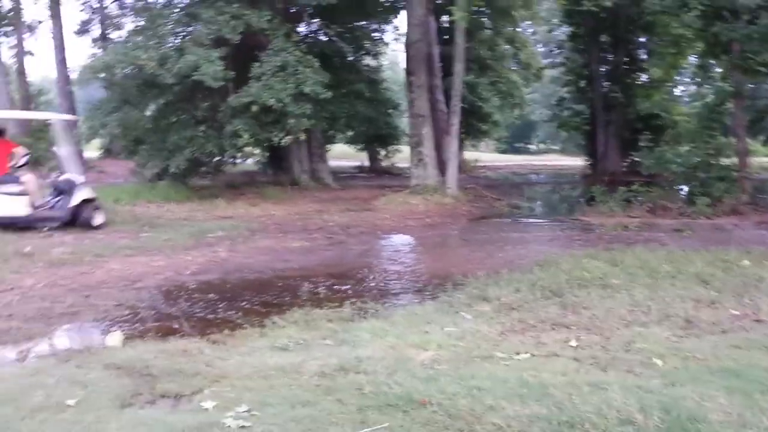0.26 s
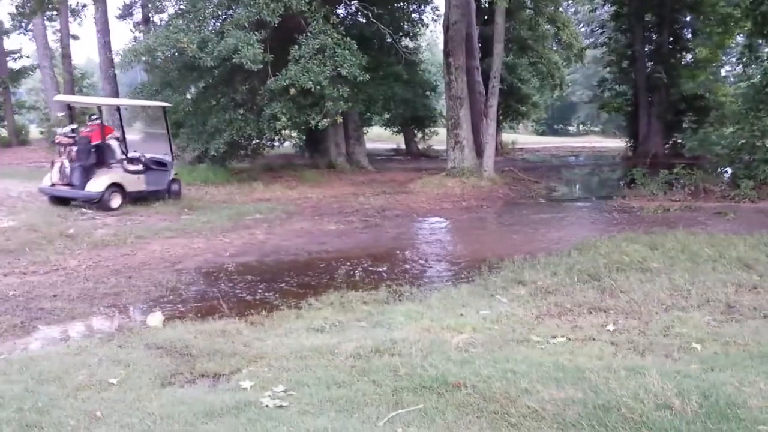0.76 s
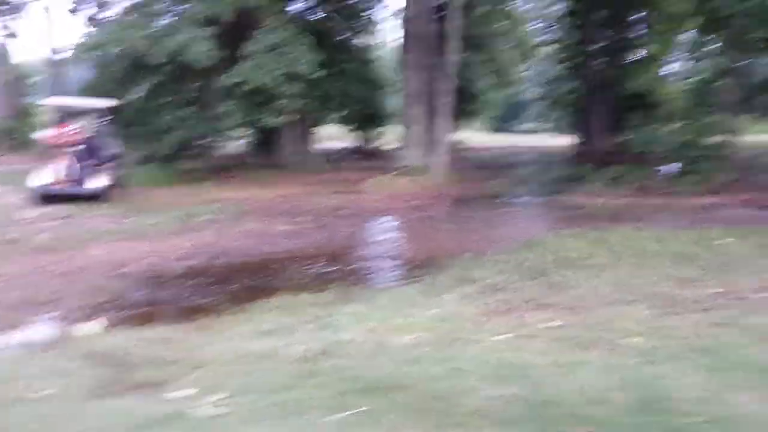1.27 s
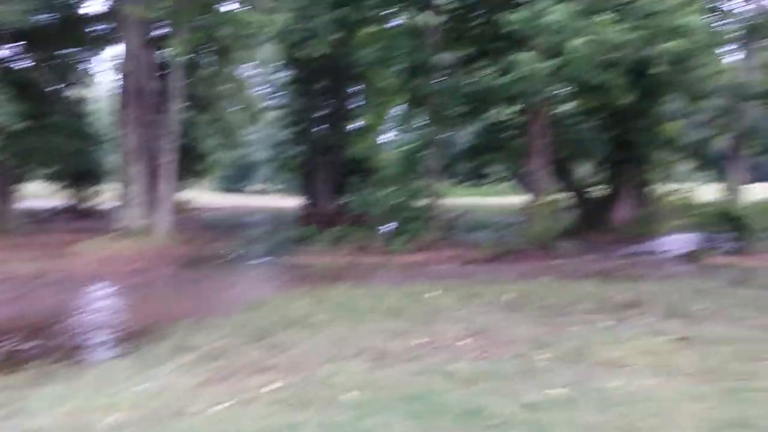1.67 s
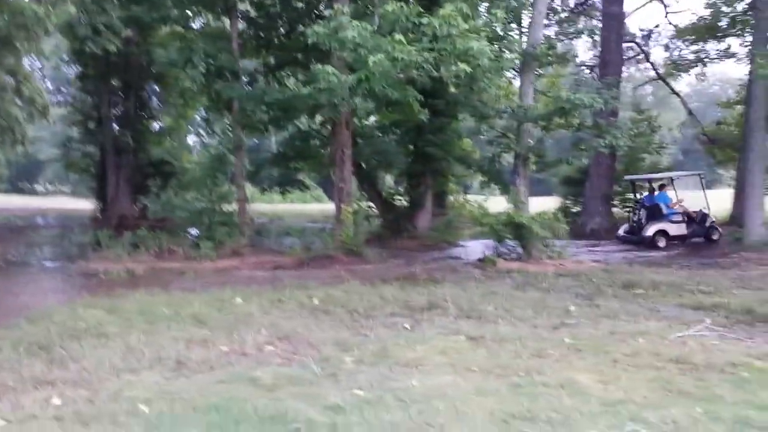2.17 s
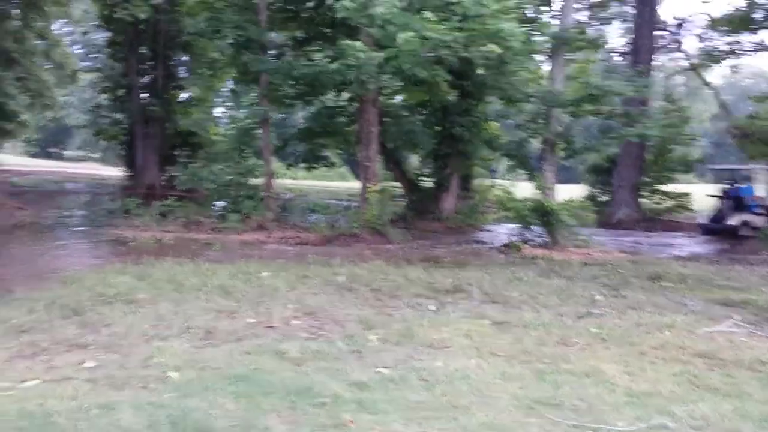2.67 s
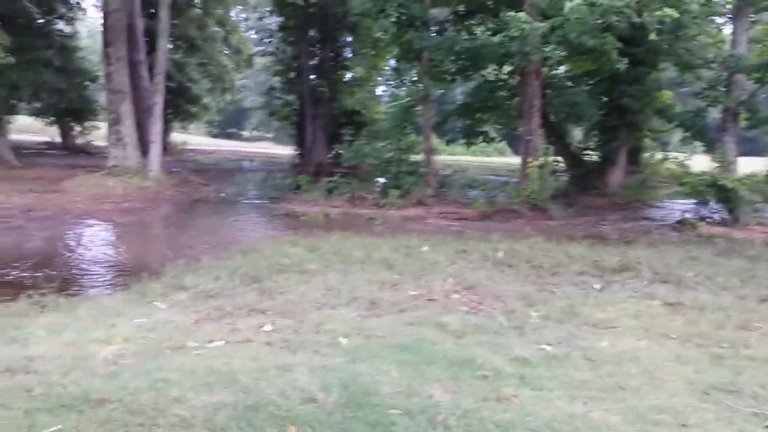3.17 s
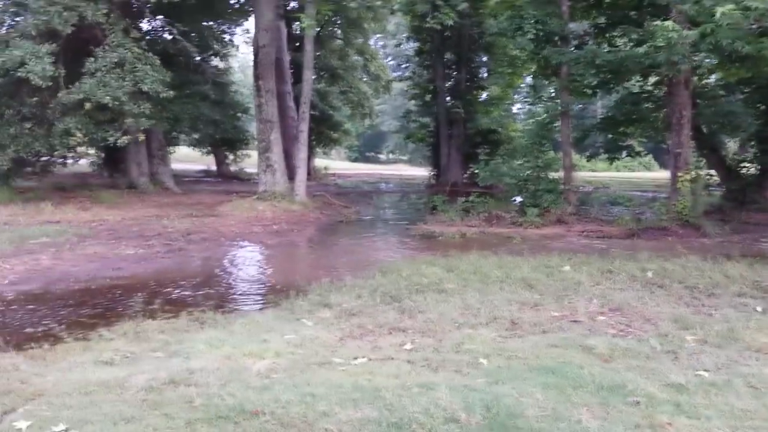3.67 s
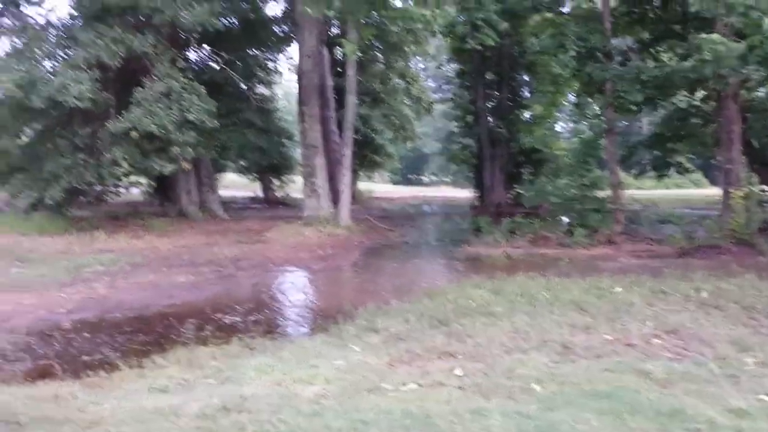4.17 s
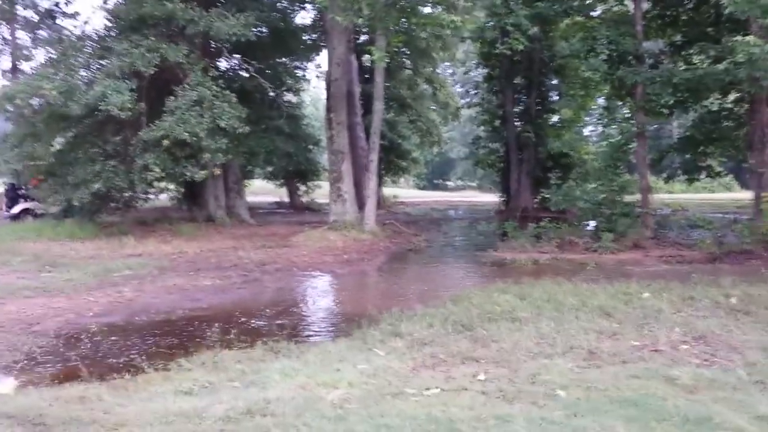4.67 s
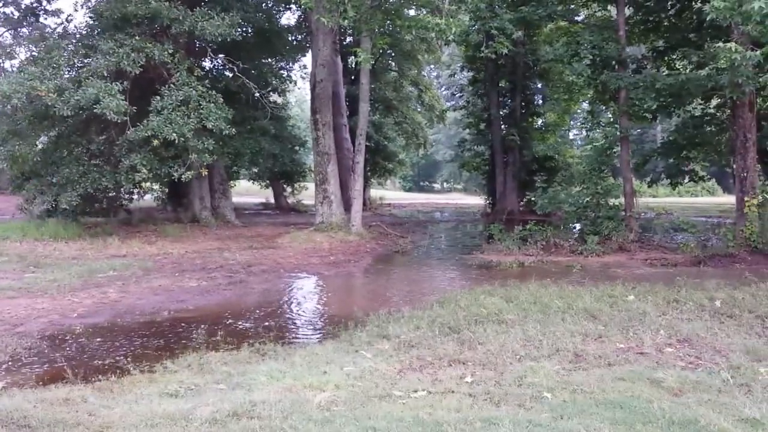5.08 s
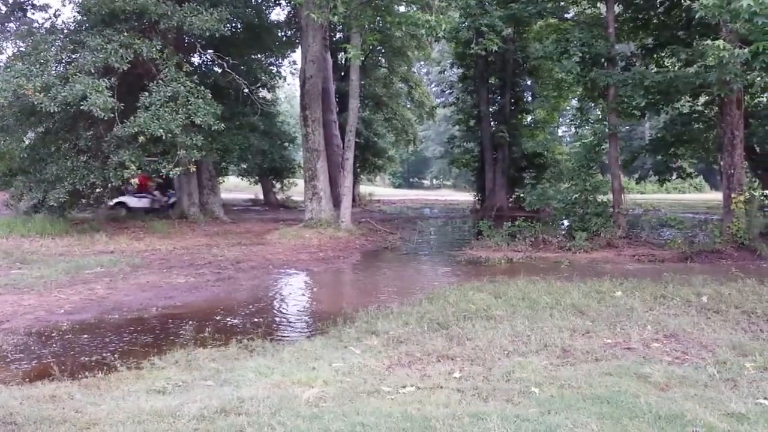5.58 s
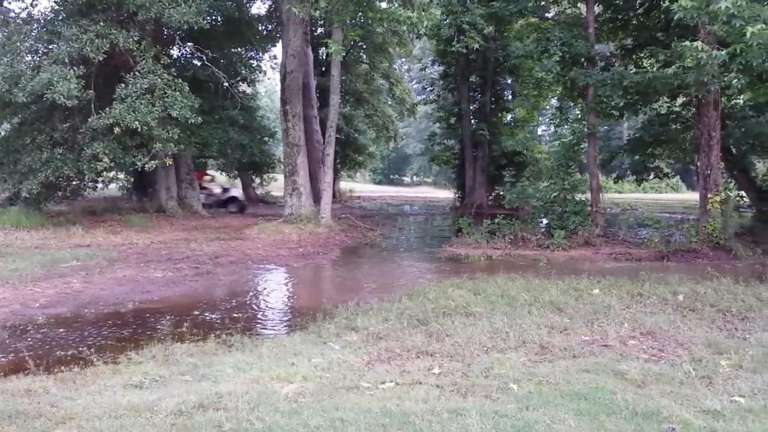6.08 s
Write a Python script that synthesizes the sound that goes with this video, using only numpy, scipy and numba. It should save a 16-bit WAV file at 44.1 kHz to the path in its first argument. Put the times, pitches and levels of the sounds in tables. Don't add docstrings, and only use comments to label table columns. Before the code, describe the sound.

Outdoors among trees, two small single-cylinder carts drive over wet ground some way off. Low puttering firings overlap, with gear and pulley whine. Slaps come first, then a rapid train of belt chirps as one pulls hard. It fades and slows in the middle, then pulls away again more gently. Watery tyre hiss, splashes and rattles continue throughout. Handheld stereo phone, bright and slightly uneven left to right.

```python
import sys
import numpy as np
from scipy import signal
from scipy.fft import rfft, irfft, next_fast_len
from scipy.io import wavfile
from scipy.ndimage import uniform_filter1d, map_coordinates
from numba import njit

SR = 44100
rng = np.random.default_rng(int(sys.argv[2]) if len(sys.argv) > 2 else 0)


def gain_from_decibels(decibels):
    exponent = np.asarray(decibels, float) / 20
    return 10 ** exponent


def dump_mix(stems):
    frames = np.atleast_2d(stems).T
    limited = np.clip(frames, -1, 1)
    pcm = np.round(limited * 32767).astype(np.int16)
    wavfile.write(sys.argv[1], SR, pcm)


N = 279153
TIME = np.arange(N) / SR

# (time [s], rate [Hz])
STEADY_RATE = [(0, 21.3), (.4, 20.7), (1.2, 22.1), (2, 22), (2.4, 22.8), (2.8, 24.1), (3.35, 24.6),
               (3.8, 24.2), (4.3, 21.8), (5, 20), (5.4, 21), (5.8, 20.5), (6.1, 21.8), (6.33, 22)]
PULLING_RATE = [(0, 14.5), (.5, 15.5), (1, 20), (1.25, 20.9), (1.4, 22), (1.6, 22.4), (1.9, 23.6),
                (2.1, 22), (2.7, 16), (3.5, 16.6), (3.8, 18.2), (4.55, 21.1), (4.9, 22), (5.3, 24.3),
                (5.6, 25.2), (5.9, 24), (6.33, 24)]
# (time [s], level [dB], upper resonances [dB])
STEADY_LEVEL = [(0, -24, 0), (.15, -33.5, 7), (.33, -29.5, 1), (.45, -35.5, 13.5), (.81, -26.5, -2),
                (1.04, -38, 16), (1.29, -35, 2), (1.85, -33, -12), (2.1, -33, 10.5), (2.5, -41.5, 13),
                (2.7, -32, 6.5), (3.24, -31, 2.5), (3.6, -30, -5), (4.15, -32.5, -8), (4.93, -32, -6),
                (5.2, -30, 6), (5.75, -37.5, -9), (6.33, -33.5, 2)]
# (time [s], level [dB])
PULLING_LEVEL = [(0, -31), (.4, -42), (.5, -31), (1.34, -23), (1.73, -23.5), (1.8, -27.5), (2.31, -50),
                 (3.2, -36.5), (4.16, -33), (4.27, -36.5), (4.58, -33), (4.99, -28.5), (5.25, -28.5),
                 (5.33, -31), (5.54, -28.5), (5.6, -35), (6.33, -34)]
PULLING_UPPER_DB = -8
# (frequency [Hz], width [Hz], level [dB])
STEADY_PIPE = [(48.7, 65, -9), (90.4, 47, 5), (146, 55, 5), (208, 117, 0), (327.5, 34.5, 3.5),
               (590, 106, -19), (848, 53, -47)]
PULLING_PIPE = [(43, 16, -5), (99, 19, 0.5), (191, 50, 2.5), (262.4, 66, 5.5), (398, 30, -21),
                (555, 320, -12.5), (880, 50, -55)]
BAFFLES_S = [.0031, .0057, .0093, .0149]
# (time [s], pitch factor [1])
BOOM_PITCH = [(0, 1.28), (.95, 1.08), (1.15, 0.89), (1.8, 1.025), (4.3, 1.1), (4.7, 1.145), (5.02, 1.12),
              (5.12, 1.1), (5.33, 0.99), (5.42, 0.93), (5.5, 1.16), (5.6, 1.05), (6.33, 1.05)]
BOOM_SPAN_HZ = 150, 300
KNOCK_LEAD_S = 0.009

# (middle [s], peak [dB], length [s])
TAPPET = [
    (6.04, -39, 0.35),
    (1.25, -38, 0.23),
    (3.84, -43, 0.33),
]
TAPPET_AT_S = 6.02

# (time [s], frequency [Hz], peak [dB], length [s])
GEARS = [(0.358, 1430, -33, 0.37), (0.63, 1396, -25, 0.034), (0.949, 1457, -21.5, 0.054),
         (1.169, 1390, -18.5, 0.024), (1.262, 1407, -26, 0.013), (1.452, 1420, -24.5, .015),
         (1.585, 1401, -22.5, 0.016), (1.661, 1370, -30, .06), (2.121, 1450, -27, 0.085),
         (2.358, 1387, -30.5, 0.1), (4.035, 1448, -37.5, 0.31), (4.454, 1425, -35.5, 0.16),
         (4.701, 1394, -41, 0.15), (4.952, 1390, -35, 0.093), (5.202, 1382, -33.5, 0.17),
         (5.47, 1359, -38.5, 0.2)]
# (time [s], frequency [Hz])
PULLEY_PITCH = [(0, 863), (.5, 870), (.95, 850), (1.3, 853), (2, 900), (2.2, 880), (2.55, 904), (2.66, 920),
                (2.75, 990), (2.88, 922), (3.12, 1000), (3.3, 905), (4, 823), (4.45, 898), (4.8, 880),
                (5.2, 837), (6.33, 792)]
PULLEY_DB, PULLEY_PER_NEAR, PULLEY_PER_LOAD = -30, 1, 0.18
NEAR_DB, LOAD_DB = -31, -33
CASING_HZ, CASING_DB = 597, -44.5

# (time [s], peak [dB], frequency [Hz])
SQUEAKS = [(0.5676, -29, 2150), (0.63, -27, 2180), (0.941, -32, 2160), (1.0585, -35, 2220),
           (1.1089, -30, 2140), (1.1583, -23.5, 2134), (1.2062, -26, 2100), (1.254, -21, 2100),
           (1.2674, -26, 2060), (1.301, -20, 2160), (1.3483, -19, 2190), (1.3942, -22, 2170),
           (1.4391, -19.5, 2180), (1.484, -22, 2230), (1.5294, -21, 2210), (1.5743, -26, 2170),
           (1.617, -29, 2290), (1.6626, -26.5, 2170), (1.707, -23, 2260), (1.7505, -24, 2270),
           (1.7993, -26, 2220), (1.8367, -22, 2260), (1.879, -23, 2260), (1.93, -32, 2330)]
# (time [s], peak [dB], frequency [Hz])
FAR_SQUEAKS = [(3.0624, -33, 2740), (3.1435, -31, 2540), (3.2111, -35, 2770), (3.3423, -33, 2720),
               (3.4032, -32, 2600), (3.4426, -33, 2630), (3.4825, -35, 2820), (3.5219, -33, 2810),
               (3.6092, -32, 2810)]
SQUEAK_RISE_S, SQUEAK_FALL_S, SQUEAK_BEND_PER_S, SQUEAK_DB = 0.00095, 0.0032, 0.65, 10.5
# (middle [s], peak [dB], length [s])
BELT_RUB = [
    (.62, -51, .15),
    (1.0, -46, .1),
    (1.25, -41, .2),
    (1.7, -51, 0.15),
]
RUB_HZ = 2170

# (time [s], hiss [dB], roll [dB])
TYRES = [(0.0, -28, -32), (0.09, -27.5, -31.5), (0.3, -28, -34.5), (1.5, -25, -31.5), (1.97, -27.5, -33),
         (2.26, -33, -33), (3.01, -32.5, -33.5), (3.26, -33.5, -38), (3.45, -35.5, -38), (4.21, -32, -36.5),
         (4.28, -33, -41.5), (4.44, -34, -38), (4.7, -32.5, -40), (4.94, -36, -42.5), (5.05, -34, -44),
         (5.38, -31.5, -42.5), (5.82, -37.5, -47.5), (6.33, -30, -39.5)]
# (time [s], level [dB], length [s])
PUDDLES = [(0, -14, 0.026), (0.538, 1, 0.19), (0.885, -3, 0.25), (1.51, -4, 0.049), (1.82, 6.5, 0.058),
           (2.07, -4, 0.11), (1.916, 6, 0.026), (2.198, 6.5, 0.15), (2.747, 0, .15), (2.567, -7, 0.034),
           (3.183, 7, 0.047), (3.404, -11, 0.019), (3.707, 10.5, 0.043), (3.846, 6.5, 0.086),
           (4.063, 8, 0.02), (4.323, 17.5, 0.029), (4.659, 5, 0.12), (4.996, 21, 0.017), (5.034, 15, 0.037),
           (5.515, 14, 0.024), (5.873, -1, 0.086)]
# (frequency [Hz], level [dB])
ROLL = [(60, -9.5), (250, 5.5), (450, -2.5), (900, -5), (1200, -10.5), (1500, -10.5), (1900, -12.5),
        (3000, -18), (4000, -36)]
# (frequency [Hz], side minus mid [dB])
ROLL_SIDE = [(60, -22), (250, -9.5), (600, -8), (1200, 1.5), (4000, 1)]
# (time [s], lag [samples])
PORT_LAG = [(0, 8), (.6, 5.6), (1.2, 5.9), (1.55, 8.4), (1.72, 10.1), (1.9, 11.7), (2.5, 10.4), (3.2, 14.7),
            (3.7, 8.7), (4.3, 8.7), (5.2, 7.1), (6.33, 4.5)]
SPRAY_DB, SPRAY_PER_NEAR, ROLL_DB, HISS_DB = -13, 0.92, 5, 4.5
HISS_SHARED = 0.78

# (time [s], peak [dB], frequency [Hz])
SLAPS = [(0.106, -12, 5200), (.1735, -20, 5490), (0.2256, -5.5, 5730), (.2365, -5, 5700),
         (0.3017, -10, 5300), (.325, -0.5, 5900), (0.455, -9, 6770), (.9782, -17, 5960),
         (1.3668, -26, 5350), (1.4545, -14, 6070), (1.5533, -11, 6100), (1.592, -7, 6430),
         (1.787, -8, 5440), (2.159, -11.5, 6000), (2.734, -15.5, 6640), (2.778, -17, 6040),
         (2.845, -8.5, 5250), (3.1592, -18, 5970), (3.21, -22, 6500), (3.23, -19, 5600), (3.345, -20, 5800),
         (3.412, -19, 5200), (3.276, -19, 5550), (3.301, -21, 5600), (3.4326, -13.5, 5900),
         (3.4436, -11.5, 4650), (3.482, -14, 6100), (4.537, -17, 5270), (4.546, -16, 6460),
         (4.6137, -13, 6440), (4.658, -14.5, 5580), (5.3148, -21, 6100), (6.02, -16, 5970),
         (6.1562, -18, 6330)]
# (time [s], peak [dB], frequency [Hz], treble [dB])
SPLASHES = [(.0647, -9, 6070, -17), (.19, -18, 5950, -11), (1.0355, -20, 6400, -23),
            (1.261, -28, 6050, -12), (1.7705, -20, 6050, -12), (2.0495, -23, 6420, -1),
            (2.0824, -15, 4460, -18), (2.686, -23, 6500, -12), (2.548, -15, 5550, -19),
            (2.591, -17, 7400, -12), (2.9803, -13.5, 5960, -19), (3.063, -18, 6200, -12),
            (3.1114, -7, 6630, -29), (3.168, -9, 7200, -21), (3.182, -11, 5600, -17),
            (3.2968, -6, 5460, -24), (3.384, -17, 6000, -22), (3.697, -11.5, 5400, -25),
            (3.851, -15.5, 5860, -20), (4.2737, -26, 6150, -10), (3.404, -21, 5870, -16),
            (3.836, -19, 6800, -16), (4.037, -15, 6950, -22), (4.509, -21, 6385, -10),
            (4.9687, -22.5, 6870, 0), (4.984, -22, 6800, -17), (4.9002, -34, 6540, -8),
            (5.224, -28, 6500, -10), (5.5113, -15.5, 7130, -23), (5.4914, -28, 6300, -18),
            (5.88, -14, 6490, -22), (6.192, -21, 6300, -15), (6.2492, -25, 6300, -15)]
SLAP_TOP_DB, SLAP_TAIL_S = -33, 0.039

# (time [s], peak [dB], frequency [Hz], t60 [s], rise [s])
RINGS = [(0.326, -21.5, 4700, 0.07, 0.0018), (0.453, -28, 6800, .12, .002),
         (2.079, -14.5, 4425, 0.09, 0.003), (3.3, -24, 4650, 0.1, 0.003), (3.298, -26, 5100, 0.05, 0.0014),
         (3.73, -31, 4400, 0.065, .004), (3.959, -32, 6300, 0.097, .004), (2.911, -35, 2400, 0.1, 0.009),
         (4.815, -33, 3330, 0.067, .005), (4.987, -34, 2650, .08, .005), (5.025, -35, 2850, .08, .005),
         (4.51, -33, 6390, 0.27, 0.0039), (4.97, -35, 6750, 0.3, 0.0034), (6.17, -45, 4650, .4, .004)]
# (time [s], peak [dB], frequency [Hz], t60 [s], rise [s])
WHISTLE = [
    (3.975, -32, 2810, .8, .015),
    (4.02, -36, 2810, .6, .02),
    (4.06, -33, 2810, .3, .015),
]

# (frequency [Hz], level [dB])
GROUND = [(700, -0.5), (960, -3.5), (1060, -5.5), (1250, -3), (1450, -2.5), (1850, -5), (2200, -0.5)]
# (frequency [Hz], level [dB])
LEFT_PORT = [(30, -4), (100, 0), (2900, -1), (4000, 2.5), (5200, 10.5), (6250, 13.5), (7100, 6.5),
             (8200, 0), (10000, -10), (11300, -10.5), (12500, -46), (13500, -64), (15000, -28)]
RIGHT_PORT = [(30, -0.5), (100, -0.5), (2000, -2), (4000, -1.5), (5000, -0.5), (6000, -9), (7500, -4.5),
              (9000, -3.5), (11000, -10), (12500, -10), (13500, -14.5), (15000, -36.5)]


def curves(table):
    s, *columns = np.transpose(table)
    return [np.interp(TIME, s, c) for c in columns]


def swells(s, db, length, floor_db):
    s, length = np.array(s)[:, None], np.array(length)[:, None]
    bells = gain_from_decibels(np.array(db))[:, None] * np.exp(-((TIME - s) / length) ** 2)
    return 20 * np.log10(gain_from_decibels(floor_db) + bells.sum(axis=0))


def walk(rate_hz):
    k = int(SR / rate_hz)
    held = np.repeat(rng.standard_normal(N // 200), k)[:N]
    return 1.562 * uniform_filter1d(uniform_filter1d(held, k), k)


def unit(x):
    return x / np.sqrt(np.mean(x ** 2))


def colour(x, points, size=4096):
    hz, db = np.transpose(points)
    grid_hz = np.arange(size // 2 + 1) * SR / size
    gain_db = np.interp(np.log(grid_hz + 1), np.log(hz), db)
    cepstrum = irfft(np.log(gain_from_decibels(gain_db)))
    cepstrum[1:size // 2] *= 2
    cepstrum[size // 2 + 1:] = 0
    return signal.fftconvolve(x, irfft(np.exp(rfft(cepstrum))))[:N]


@njit
def band(x, hz, width):
    y, b, low = np.empty(len(x)), 0., 0.
    for i in range(len(x)):
        g, k = np.tan(np.pi * hz[i] / SR), width / hz[i]
        v = (b + g * (x[i] - low)) / (1 + g * (g + k))
        b, low, y[i] = 2 * v - b, low + 2 * g * v, k * v
    return y


def ring(x, hz, width):
    return band(x, np.full(len(x), 1. * hz), 1. * width)


def baffles(x, stretch, echo=0.66):
    size = next_fast_len(N + SR // 2)
    hz = np.arange(size // 2 + 1) * SR / size
    delays_s = stretch * np.array(BAFFLES_S)[:, None]
    turn = np.exp(-2j * np.pi * hz * delays_s)
    chambers = np.prod((turn - echo) / (1 - echo * turn), axis=0)
    return irfft(rfft(x, size) * chambers, size)[:N]


def cart(rate, db, upper_db, pipe, fires_s, stretch, intake, scatter_db, gas_db, knock, boom):
    (hz,) = curves(rate)
    turns = np.cumsum(hz * (1 + 0.003 * walk(20))) / SR
    turns += 100 - turns[int(fires_s * SR)]
    stroke = (2 * turns).astype(int)
    size = gain_from_decibels(scatter_db * rng.standard_normal(800))[stroke]
    steps = np.diff(stroke, prepend=stroke[0])
    blows = unit(steps * size * np.where(stroke % 2, intake, 1))
    blows = blows + knock * np.roll(blows, -int(KNOCK_LEAD_S * SR))
    gas = unit((0.4 + np.exp(-(turns % 1) / 0.45)) * rng.standard_normal(N))
    drive = baffles(blows + gain_from_decibels(gas_db) * gas, stretch)
    sound = np.zeros(N)
    for k, (mode_hz, width, mode_db) in enumerate(pipe):
        moves = BOOM_SPAN_HZ[0] < mode_hz < BOOM_SPAN_HZ[1]
        centre_hz = mode_hz * (boom if moves else np.ones(N))
        mode = band(band(drive, centre_hz, 1. * width), centre_hz, 2. * width)
        sound = sound + (-1) ** k * gain_from_decibels(mode_db + (mode_hz > 300) * upper_db) * mode
    return unit(sound) * gain_from_decibels(db), turns % 1, size


def tappet(phase, size):
    since = (phase - phase[int(TAPPET_AT_S * SR)]) % 1
    rattle = size ** 3 * np.exp(-since / 0.22) * rng.standard_normal((2, N))
    level_db = swells(*np.transpose(TAPPET), floor_db=-79)
    return np.array([unit(ring(ear, 9800, 3500)) for ear in rattle]) * gain_from_decibels(level_db)


def whine(hz, db, phase, width, throb, offset_db, clean):
    rough = unit(band(band(rng.standard_normal(N), hz, width), hz, 2 * width))
    pure = np.sin(2 * np.pi * np.cumsum(hz * (1 + 0.0057 * walk(40))) / SR)
    pulse = np.exp(throb * np.cos(2 * np.pi * (phase - 0.22)))
    return unit((rough + clean * pure) * pulse) * gain_from_decibels(db + offset_db)


def axle_gears(phase):
    s, hz, db, length = np.transpose(GEARS)
    level_db = swells(s, db, length, floor_db=-72)
    return whine(np.interp(TIME, s, hz), level_db, phase, width=70.0, throb=0.45, offset_db=-9, clean=1.1)


def clutch_pulley(phase, near_db, load_db):
    level_db = PULLEY_DB + PULLEY_PER_NEAR * near_db + PULLEY_PER_LOAD * load_db
    (hz,) = curves(PULLEY_PITCH)
    return whine(hz, level_db, phase, width=160.0, throb=0.68, offset_db=-4.5, clean=0.13)


def engine_casing(phase, load_db):
    hz = CASING_HZ * (1 + 0.05 * walk(2.9))
    return whine(hz, CASING_DB + 0.28 * load_db, phase, width=118.0, throb=0.53, offset_db=-1, clean=0.17)


def belt_squeaks():
    out, t = np.zeros(N + 3000), TIME[:3000]
    fall = np.exp(-t / SQUEAK_FALL_S) + 0.041 * np.exp(-t / 0.015)
    shape = (1 - np.exp(-t / SQUEAK_RISE_S)) * fall
    for s, db, hz in [*SQUEAKS, *FAR_SQUEAKS]:
        tone = np.sin(2 * np.pi * hz * t * (1 + SQUEAK_BEND_PER_S * t))
        rough = unit(ring(rng.standard_normal(len(t)), hz, 250))
        start = int(s * SR)
        out[start:start + len(t)] += gain_from_decibels(db + SQUEAK_DB) * shape * (tone + 0.23 * rough)
    return out[:N]


def belt_rub(phase):
    level_db = swells(*np.transpose(BELT_RUB), floor_db=-75)
    return whine(np.full(N, 1. * RUB_HZ), level_db, phase, width=170.0, throb=0.6, offset_db=2.5, clean=0)


def loose_metal():
    out, t = np.zeros(N + 20000), TIME[:20000]
    for s, db, hz, t60, rise in [*RINGS, *WHISTLE]:
        chatter = 0.39 * max(hz / 5000, 1) ** 4
        rough = unit(ring(rng.standard_normal(len(t)), hz, hz / 25))
        tone = np.sin(2 * np.pi * hz * t) + chatter * rough
        shape = (1 - np.exp(-t / max(rise, 1e-4))) * np.exp(-t * np.log(1000) / t60)
        start = int(s * SR)
        out[start:start + len(t)] += gain_from_decibels(db) * shape * tone
    return out[:N]


def slaps():
    out, t = np.zeros((2, N + 8000)), TIME[:8000]
    tail = np.exp(-t * np.log(1000) / SLAP_TAIL_S)
    dull = [(*row, SLAP_TOP_DB) for row in SLAPS]
    for s, db, hz, top_db in [*dull, *SPLASHES]:
        noise = rng.standard_normal((3, len(t)))
        tick = np.sign(noise[2]) * np.exp(-t / 0.0009)
        start = int(s * SR)
        for ear in range(2):
            burst = 0.69 * tick + 0.51 * noise[ear] * tail
            body = ring(ring(ring(burst, hz, 2300), hz, 3700), hz, 3700)
            top = ring(ring(burst, 10000, 7000), 12000, 9000)
            both = body / abs(body).max() + gain_from_decibels(top_db + 26.0) * top / abs(top).max()
            out[ear, start:start + len(t)] += gain_from_decibels(db - 9.0) * both
    return out[:, :N]


def tyres():
    wet_db, near_db = curves(TYRES)
    hiss_db = wet_db + HISS_DB
    puddle_db = swells(*np.transpose(PUDDLES), floor_db=5.0)
    spray_db = SPRAY_DB + SPRAY_PER_NEAR * (near_db - NEAR_DB) + puddle_db
    sizes = gain_from_decibels(7.9 * np.minimum(rng.exponential(size=N), 3.2))
    drops = np.where(rng.random(N) < 500 / SR, sizes, 0)
    swarm = 1 + 0.054 * signal.lfilter([1], [1, -0.985], drops)
    shared, gusts, out = walk(15), walk(11.2), []
    common = unit(ring(swarm * rng.standard_normal(N), 1640, 3500))
    (lag,) = curves(PORT_LAG)
    late = map_coordinates(common, [np.arange(N) - lag], mode="mirror")
    for ear in (late, common):
        noise = swarm * rng.standard_normal(N)
        hiss = unit(ring(noise, 4020, 7900)) + HISS_SHARED * ear
        hiss = hiss * gain_from_decibels(hiss_db - 7.0 + 1.0 * shared + 0.5 * walk(30))
        spray = unit(ring(noise, 10830, 7440))
        spray = spray * gain_from_decibels(hiss_db + spray_db + 4.5 + 0.1 * shared + 0.49 * gusts)
        out.append(hiss + spray)
    mid, side = (colour(rng.standard_normal(N), ROLL) for _ in range(2))
    side = colour(side, ROLL_SIDE)
    roll_db = near_db + ROLL_DB + 1.5 + 0.52 * walk(6.9)
    return np.array(out) + unit(np.array([mid + side, mid - side])) * gain_from_decibels(roll_db)


def trees(x, lag, t60, wet_db):
    t = TIME[:16000]
    tint = [(100, -36), (400, 1.0), (1200, 2.5), (16000, -2.0)]  # (Hz, dB)
    echoes = rng.standard_normal((2, len(t))) * np.exp(-t * np.log(1000) / t60) * (t > 0.002)
    echoes = [unit(colour(e, tint)) / np.sqrt(len(t)) for e in echoes]
    direct = np.array([np.roll(x, lag), x])
    return direct + gain_from_decibels(wet_db) * np.array([signal.fftconvolve(x, e)[:N] for e in echoes])


def scene():
    steady, cycle, push = cart(
        STEADY_RATE, *curves(STEADY_LEVEL), STEADY_PIPE, fires_s=3.1, stretch=1.2, intake=0.3,
        scatter_db=1.2, gas_db=-5, knock=0, boom=np.ones(N))
    (pulling_db,), (boom,) = curves(PULLING_LEVEL), curves(BOOM_PITCH)
    pulling, phase, _ = cart(
        PULLING_RATE, pulling_db, PULLING_UPPER_DB, PULLING_PIPE, fires_s=1.39, stretch=0.5, intake=0.15,
        scatter_db=1.3, gas_db=-13, knock=0.45, boom=boom)
    near_db, load_db = curves(TYRES)[1] - NEAR_DB, pulling_db - LOAD_DB
    whines = axle_gears(phase) + clutch_pulley(phase, near_db, load_db) + engine_casing(phase, load_db)
    engines = trees(steady + pulling + whines, lag=4, t60=0.18, wet_db=-4)
    belt = trees(belt_squeaks() + belt_rub(phase), lag=7, t60=0.1, wet_db=-13)
    metal = trees(loose_metal(), lag=3, t60=0.12, wet_db=-9)
    mix = engines + tappet(cycle, push) + belt + metal + slaps() + tyres()
    return np.array([colour(ear, GROUND) for ear in mix])


def top_cut(x):
    return signal.sosfilt(signal.butter(12, 15070, fs=SR, output="sos"), x)


def record(dry):
    ports = np.array([colour(dry[0], LEFT_PORT), colour(dry[1], RIGHT_PORT)])
    ports = ports / (1 + ports ** 4) ** 0.25
    return top_cut(ports)


dry = scene()
out = record(dry)
dump_mix(out)
```